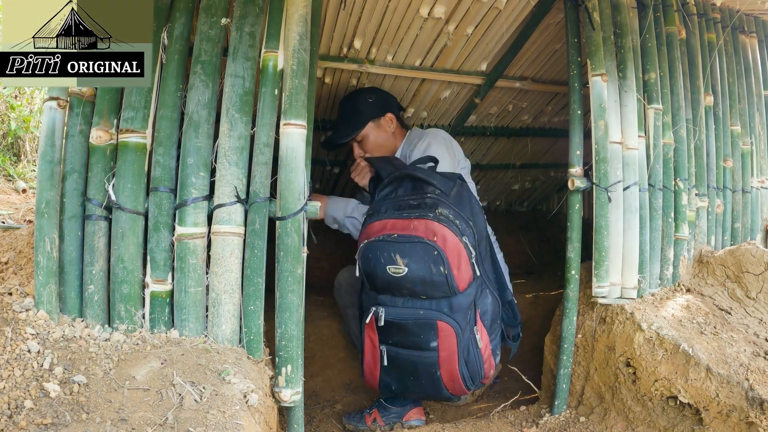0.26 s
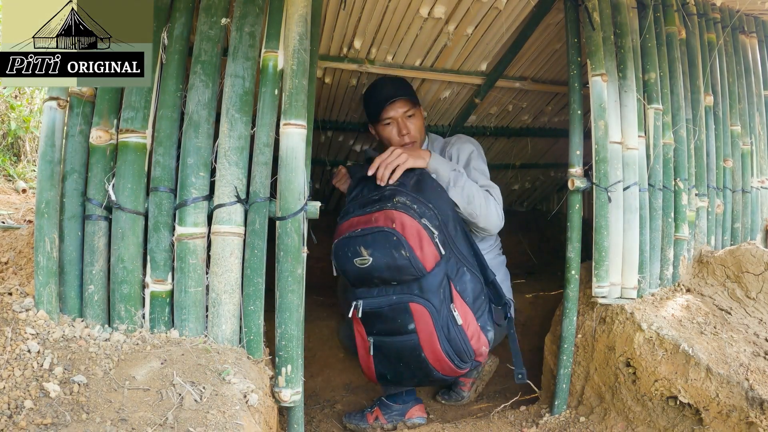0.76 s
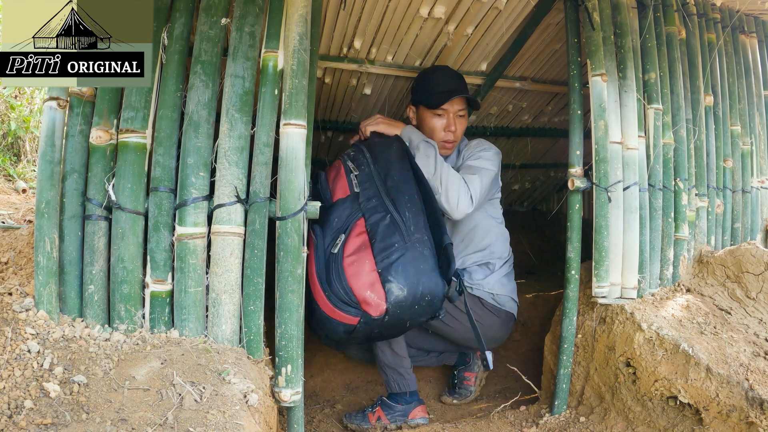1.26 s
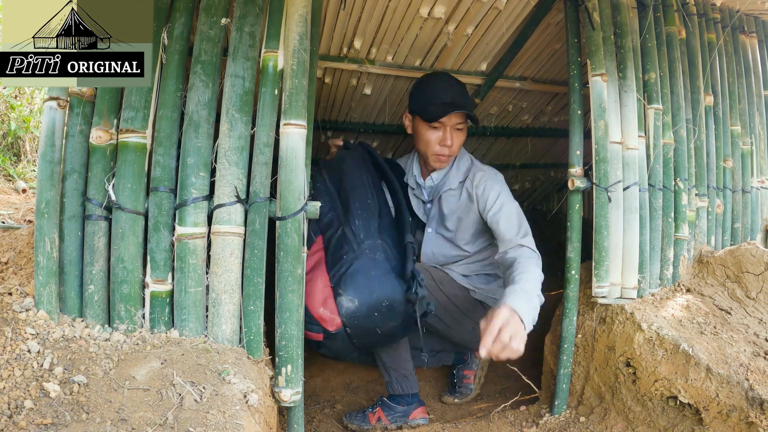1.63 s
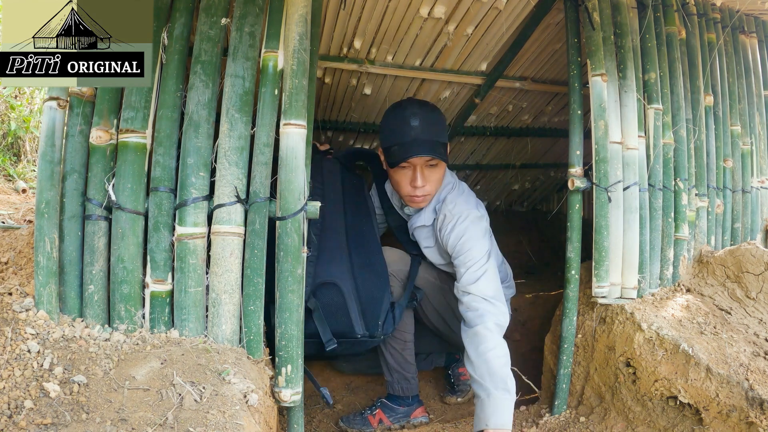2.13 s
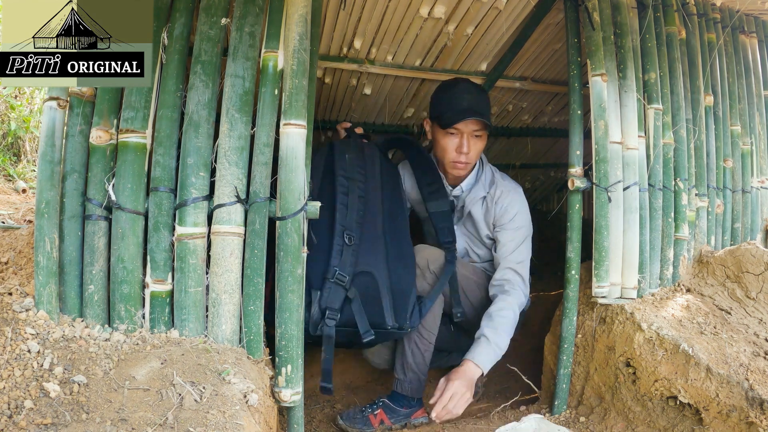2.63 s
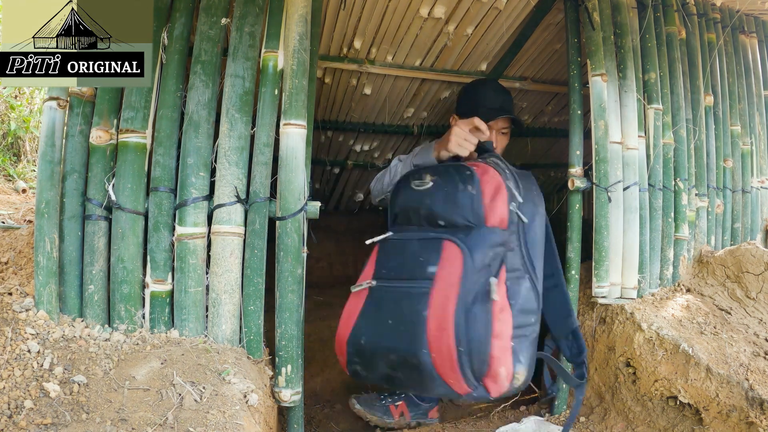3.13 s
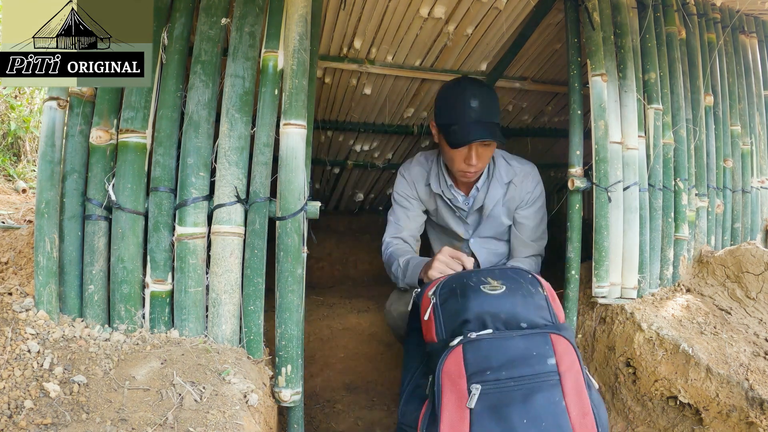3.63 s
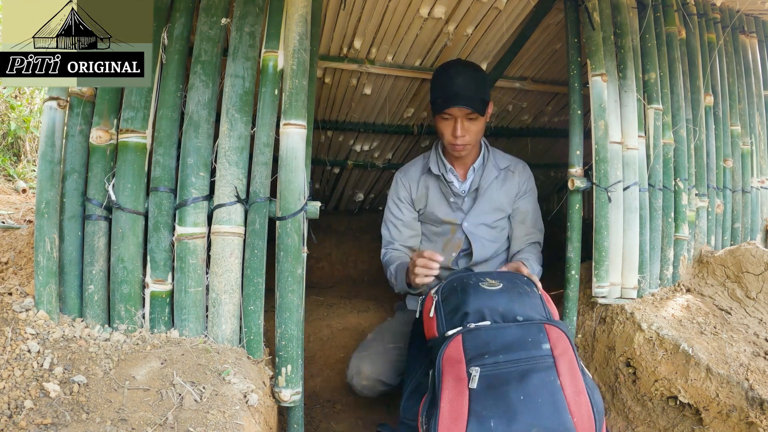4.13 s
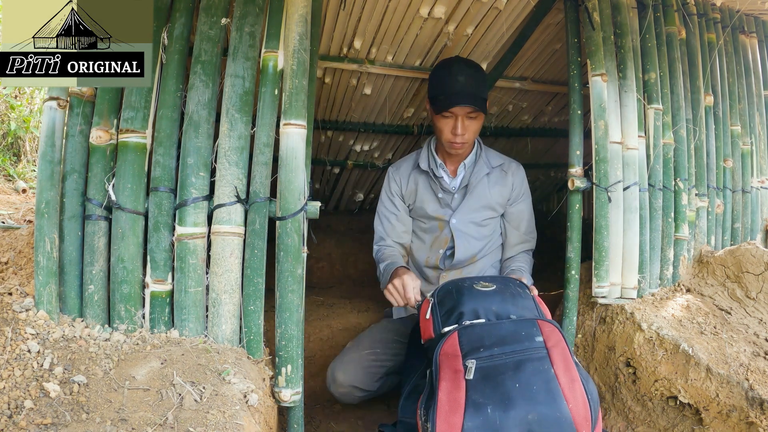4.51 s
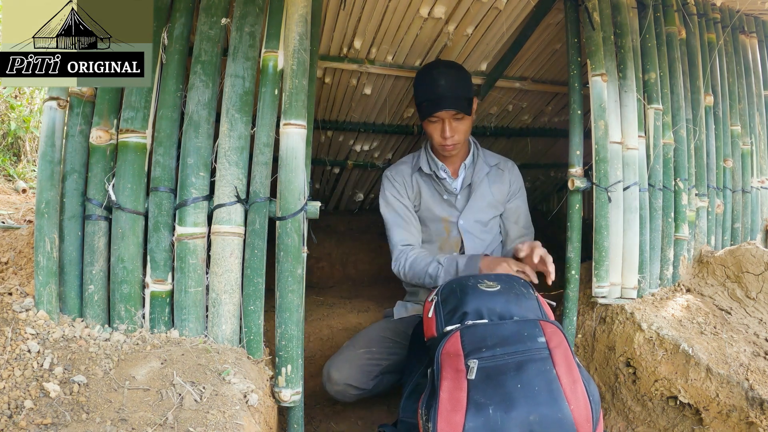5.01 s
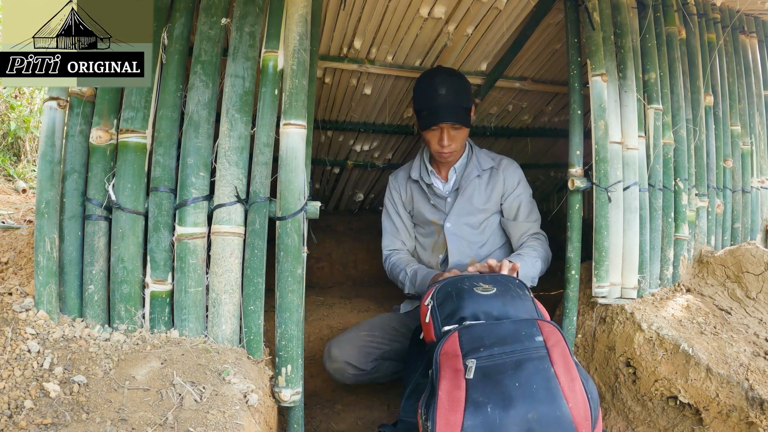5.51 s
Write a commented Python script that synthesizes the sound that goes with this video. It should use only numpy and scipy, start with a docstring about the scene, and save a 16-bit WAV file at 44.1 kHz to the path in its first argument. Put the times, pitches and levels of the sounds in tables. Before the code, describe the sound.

Birds trill and whistle over a faint river hiss while a nylon backpack is rustled, knocked, set down, zipped and patted close by.

```python
"""Beside a bamboo shelter, a river hisses far off while a backpack is handled close to a camera microphone.
From the start two birds trill arched notes over rustling nylon, and the first adds falling whistles.
A third bird, further off, gives a high pulsed whistle near 2.2 s and again near 5.2 s.
The bag is moved and set down with its loudest knock near 3.5 s, zipped at 4.7-5.1 s, then patted.
Water and cloth are shaped noise, birds are swept sines, knocks are struck resonances, the zip is a tooth train."""
import sys
import numpy as np
from scipy import signal
from scipy.fft import rfft, irfft
from scipy.io import wavfile
from scipy.ndimage import uniform_filter1d

SR = 44100
rng = np.random.default_rng(int(sys.argv[2]) if len(sys.argv) > 2 else 0)


def unload_wav(signal):
    """Save mono or channel-first audio to the path in sys.argv[1] as 16-bit WAV at rate SR, clipped to [-1, 1]."""
    wavfile.write(
        sys.argv[1],
        SR,
        np.round(np.clip(np.atleast_2d(signal).T, -1, 1) * 32767).astype(np.int16),
    )


N = 254016
T = np.arange(N) / SR


def undb(db):
    """Decibels to amplitude."""
    return 10 ** (np.asarray(db) / 20)


def unit(x):
    """Scale to an RMS of 1."""
    return x / np.sqrt(np.mean(x ** 2))


def colour(x, shape):
    """Impose a (pitch_hz, level_db) spectrum, 90 dB down outside it."""
    hz, db = np.transpose(shape)
    log_hz = np.log(np.arange(len(x) // 2 + 1) * SR / len(x) + 1)
    gain = undb(np.interp(log_hz, np.log(hz), db, left=-90, right=-90))
    return irfft(rfft(x) * gain, len(x))


def band(x, lo_hz, hi_hz):
    """Keep what lies between two frequencies."""
    return signal.sosfilt(signal.butter(3, [lo_hz, hi_hz], "bandpass", fs=SR, output="sos"), x)


def ring(x, hz, width_hz):
    """One resonance, gain 1 at its centre."""
    return signal.lfilter(*signal.iirpeak(hz, hz / width_hz, fs=SR), x)


def walk(rate):
    """Random levels held 1 / rate s and smoothed twice; spread near 1."""
    hold = int(SR / rate)
    steps = np.repeat(rng.standard_normal(N // hold + 1), hold)
    return 1.3 * uniform_filter1d(uniform_filter1d(steps, hold), hold)[:N]


def add(out, s, x):
    """Place a sound at a time in seconds, cut at the end of the scene."""
    i = max(int(s * SR), 0)
    out[i:i + len(x)] += x[:N - i]


# far water, spectrum: pitch_hz, level_db (per Hz)
RIVER_SPECTRUM = [(18, -63), (30, -34), (71, -6), (216, 5), (794, -5), (1170, -1), (2920, -5), (5170, -3.5),
                  (7830, -22), (9640, -26), (11000, -14), (13200, -46), (15000, -50)]
RIVER_DB = -51.5


def river():
    """Far water: a smooth hiss that swells a little."""
    hiss = unit(colour(rng.standard_normal(N), RIVER_SPECTRUM))
    return hiss * undb(RIVER_DB + 1.0 * walk(1.9))


def tone(rows, waver, flutter_db):
    """A near sine along (start_s, pitch_hz, level_db) rows, unsteady in pitch and level."""
    s, hz, db = np.transpose(rows)
    phase = 2 * np.pi * np.cumsum(np.interp(T, s, hz) * (1 + waver * walk(150))) / SR
    edge = np.interp(T, [s[0] - .006, s[0], s[-1], s[-1] + 0.0046], [0, 1, 1, 0])
    level = undb(np.interp(T, s, db) + flutter_db * walk(120))
    return np.sqrt(2) * edge * level * np.sin(phase)


# third bird, one call: time_ms (from the start of its level part), pitch_hz, level_db
PULSED_SHAPE = [(-128, 5950, -20), (-116, 5750, -17), (-96, 4850, -11), (-55, 4280, -9), (0, 4150, -7),
                (70, 4060, -3), (170, 3900, 0), (198, 3740, 0), (216, 3540, -3), (236, 3200, -8),
                (258, 3070, -19)]
# when it calls: start_s (of the level part), level_db, pitch_share (of the shape)
PULSED_CALLS = [(2.193, -31.5, 1.02), (5.183, -31.5, .99)]
PULSE_HZ = 53.64


def pulsed_whistles():
    """The third bird: a high falling tone whose level pulses at a steady rate."""
    out = np.zeros(N)
    ms, hz, shape_db = np.transpose(PULSED_SHAPE)
    for at, db, share in PULSED_CALLS:
        rows = np.transpose([at + ms / 1000, hz * share, db + shape_db])
        beat = (.5 + .5 * np.cos(2 * np.pi * PULSE_HZ * (T - at))) ** 2.2
        out += beat * tone(rows, .01, 1.8)
    return out


# first bird, falling whistle: time_ms (from its bend), pitch_hz, level_db
WHISTLE_SHAPE = [(-38, 1920, -20), (-8, 1760, -14), (0, 1710, -4), (45, 1660, -2), (78, 1570, 0),
                 (100, 1420, -8), (115, 1330, -22), (126, 1200, -10), (145, 1140, -26)]
# when it whistles: bend_s, level_db, pace (share of the shape's duration), stop_ms (on the shape's clock)
WHISTLES = [(.243, -32, 0.86, 78), (.74, -28, 0.91, 145), (1.338, -30.5, 0.77, 130),
            (1.832, -26.5, .88, 142)]


def falling_whistles():
    """The first bird's shared falling shape, each at its own pace and cut short where the bird breaks off."""
    out = np.zeros(N)
    ms, hz, shape_db = np.transpose(WHISTLE_SHAPE)
    for bend_s, db, pace, stop_ms in WHISTLES:
        at = np.minimum(ms, stop_ms)
        cut_hz, cut_db = np.interp(at, ms, hz), np.interp(at, ms, shape_db)
        rows = np.transpose([bend_s + pace * at / 1000, cut_hz, db + cut_db])
        out += tone(rows, 0.0061, 0.64)
    return out


def notes_of(runs, top_hz, below_db, slope):
    """Each run slows, swells and sags: rows of start_s, level_db, pitch_hz, weaker partial's trim_db."""
    rows = []
    for first, last, notes, slowing, first_db, loudest_db, last_db, loudest_at, sag in runs:
        u = np.linspace(0, 1, int(round(notes)))
        db = np.interp(u, [0, np.clip(loudest_at, .1, .9), 1], [first_db, loudest_db, last_db])
        s = first + (last - first) * (u + slowing * (u * u - u))
        # the weaker partial's trim equals below_db in a note of -22.5 dB and drops as notes get louder
        rows += zip(s, db, top_hz * (1 - sag * u ** 4.), below_db - slope * (db + 22.5))
    return rows


def trill(notes, arch, lead_ms, overtone_leads):
    """Pitch arches up and falls; the throat favours the fundamental at the top, the overtone on the slopes."""
    ms, share, first_db, second_db = np.transpose(arch)
    out, t = np.zeros(N), np.arange(ms[0], ms[-1], 1000 / SR)
    for (s, db, hz, below_db), vary in zip(notes, rng.standard_normal((len(notes), 4))):
        bent = t * (1 + 0.0825 * vary[0])
        note_hz = hz * (1 + 0.0167 * vary[2]) * np.interp(bent, ms, share)
        phase = 2 * np.pi * np.cumsum(note_hz) / SR + vary[1]
        first_gain = undb(np.interp(bent, ms, first_db) + below_db * overtone_leads)
        second_gain = undb(np.interp(bent, ms, second_db) + below_db * (not overtone_leads))
        note = first_gain * np.sin(phase) + second_gain * np.sin(2 * phase)
        add(out, s + (lead_ms + ms[0]) / 1000, undb(db - 7.0 + 1.5 * vary[3]) * note)
    return out


# one note of the first bird: time_ms (from its top), pitch_share (of the top), fundamental_db, overtone_db
LOW_ARCH = [(-14, .66, -40, -40), (-10, .76, -11, -16), (-5, .96, -5, -26), (0, 1., 0, -26),
            (4.5, .97, -3, -19), (7.5, .8, -4, -3), (11, .66, -8, -2), (16, .55, -15, -14),
            (21, .52, -40, -40)]
# one note of the second bird: same columns
HIGH_ARCH = [(-13, .62, -40, -40), (-9, .68, -15, -8), (-5, .92, -7, -14), (0, 1., 0, -19),
             (3.5, .94, -3, -11), (5.2, .8, -8, 0), (8, .65, -10, -2), (12, .56, -14, -12),
             (17, .52, -40, -40)]
# first bird, runs led by the fundamental: first_note_s, last_note_s, notes, slowing (0-1),
# first_db, loudest_db, last_db (all before the trill's 7 dB cut), loudest_at (share of run), sag (end pitch, 0-1)
LOW_RUNS = [(.056, .216, 6, .08, -29.5, -19, -21, .8, 0.05),
            (.589, .708, 5, 0.35, -29, -16.5, -19, 0.87, 0.1),
            (1.173, 1.304, 5, 0.2, -29, -18, -19.5, 0.79, 0.03),
            (1.649, 1.811, 6, 0.28, -30, -16.5, -25, .6, 0.15),
            (2.161, 2.362, 7, .26, -23, -17.5, -21.5, 0.43, .01),
            (2.604, 2.671, 3, 0.07, -25, -19, -22, .5, 0), (2.704, 2.788, 3, 0.2, -21, -20, -21, .5, 0)]
# second bird, runs led by the overtone: same columns
HIGH_RUNS = [(.042, 0.13, 3, 0.093, -29.5, -22.5, -20.5, .5, 0.0018),
             (.187, 0.43, 7, 0.11, -37, -22.5, -23.5, .5, 0.0025),
             (.544, 0.66, 4, .02, -27, -25, -30, .33, 0.014),
             (.713, 0.86, 4, 0.047, -24.5, -17.5, -24.5, .33, 0.011),
             (1.035, 1.035, 1, 0, -23, -24, -24, .5, 0), (1.172, 1.43, 7, .05, -37, -22, -21.5, .5, 0),
             (1.493, 1.587, 3, .18, -26, -24, -27.5, .5, 0.018),
             (1.812, 2.105, 8, 0.014, -24.5, -15.5, -19, .7, 0.0077),
             (2.311, 2.481, 5, 0.13, -27, -20, -20, .5, 0.0026),
             (2.799, 2.883, 3, 0.42, -35, -28, -33, .5, 0.0012)]


def trills():
    """Two trilling birds, one led by the fundamental and one by the overtone."""
    low_notes = notes_of(LOW_RUNS, top_hz=2131, below_db=-4, slope=1.1)
    high_notes = notes_of(HIGH_RUNS, top_hz=2041, below_db=-5, slope=.4)
    low = trill(low_notes, LOW_ARCH, lead_ms=5.6, overtone_leads=False)
    return low + trill(high_notes, HIGH_ARCH, lead_ms=-4., overtone_leads=True)


# the trills' echo off the ground, which combs the notes: delay_ms, level_db
GROUND = (1.87, -3)
# their repeats off posts and trees: delay_ms, level_db
ECHOES = [(4.6, -6), (10.5, -10), (13.5, -16), (17, -14), (21, -19.5), (26, -17.5)]
TREES_T60_S, TREES_DB = .22, -2.5


def birds():
    """All three birds come direct and back from the trees; the trills also come off ground and posts."""
    calls, whistles, pulsed = trills(), falling_whistles(), pulsed_whistles()
    path = np.zeros(int(.4 * SR))
    path[0] = 1
    for ms, db in [GROUND] + ECHOES:
        path[int(ms * SR / 1000)] = undb(db)
    tail = rng.standard_normal(len(path)) * 1000 ** (-T[:len(path)] / TREES_T60_S)
    tail *= undb(TREES_DB) / np.sqrt(np.sum(tail ** 2))
    # the third bird sits further off, so more of it arrives by way of the trees
    wet = signal.fftconvolve(calls + 0.42 * whistles + 1.1 * pulsed, tail)[:N]
    return signal.fftconvolve(calls, path)[:N] + whistles + pulsed + wet


# zip close by: start_s, teeth_hz (teeth a second), hum_db, scrape_db (of the slider)
ZIP = [(4.67, 204, -57, -66), (4.701, 204, -33.5, -42), (4.735, 212, -33, -30.5), (4.8, 275, -35, -28.5),
       (4.85, 360, -37, -38), (4.885, 310, -31.5, -39), (4.941, 310, -41, -52), (4.985, 240, -33.5, -47),
       (5.03, 230, -39, -44), (5.06, 260, -49, -65)]
# resonances of the slider: pitch_hz, width_hz, level_db
ZIP_BODY = [(800, 180, -6), (1230, 620, 2.5), (2300, 750, -5), (3140, 420, -11)]


def zip_pull():
    """The slider knocks each tooth: the bag's wall hums at the tooth rate, uneven knocks ring the slider."""
    s, rate, hum_db, scrape_db = np.transpose(ZIP)
    teeth = np.cumsum(np.interp(T, s, rate) * (1 + .03 * walk(100))) / SR
    pulses = np.diff(np.floor(teeth), prepend=0) * undb(3.0 * rng.standard_normal(N))
    scrape = np.zeros(N)
    for hz, width_hz, db in ZIP_BODY:
        scrape += undb(db) * unit(ring(ring(pulses, hz, width_hz), hz, width_hz))
    hum = np.sqrt(2) * undb(4.0 * walk(45)) * np.sin(2 * np.pi * teeth)
    hum_gain = undb(np.interp(T, s, hum_db, left=-120, right=-120))
    scrape_gain = undb(np.interp(T, s, scrape_db, left=-120, right=-120))
    return hum * hum_gain + unit(scrape) * scrape_gain


# ticks and knocks close by: start_s, level_db (peak of the body), pitch_hz, treble_db (before a 10.5 dB lift)
KNOCKS = [(0.754, -23.5, 1600, -10), (.78, -20.5, 1650, -11.5), (0.955, -16, 2470, -34),
          (.971, -12, 2870, -12.5), (1.093, -19.5, 1120, -17), (1.428, -24, 1390, -8.5),
          (2.002, -17, 3330, -8), (2.085, -24, 1880, -23), (2.487, -22, 730, -18), (2.732, -19, 2150, -31),
          (2.972, -23.5, 2540, -38), (3.135, -22.5, 2950, -12.5), (3.289, -22, 1200, -15),
          (3.33, -21, 1740, -17.5), (3.384, -31.5, 760, -8), (3.427, -23, 2070, -27),
          (3.458, -29, 2770, -13), (3.484, -8, 750, -12), (3.517, -11.5, 2240, -27), (3.534, -32, 730, -21),
          (3.569, -25, 2920, -20), (3.727, -17.5, 2670, -29), (3.895, -27, 3340, -15),
          (3.987, -28.5, 1280, -16), (4.422, -31.5, 1260, -12), (4.693, -25, 780, -20),
          (5.066, -37, 688, -16), (5.145, -36.5, 4400, 5), (5.198, -36, 4050, -11),
          (5.304, -23.5, 4400, -10.5), (5.329, -25, 3950, -13.5), (5.37, -30.5, 900, -13),
          (5.399, -31, 1500, -11.5), (5.468, -34.5, 1513, -12), (5.488, -24, 2980, -19),
          (5.52, -22, 2290, -20), (5.545, -15, 2100, -14), (5.591, -14.5, 905, -14),
          (5.608, -21.5, 730, -6), (5.65, -23, 818, -10), (5.671, -14, 2350, -21), (5.711, -20.5, 820, -17)]
# spectrum of the bright tick: pitch_hz, level_db (per Hz)
TICK = [(2500, -5), (4500, 17.5), (6500, 5.5), (8500, 2), (10500, -20), (15000, -34)]
KNOCK_T60_S, KNOCK_BUILD_MS = 0.066, 0.34


def knocks():
    """A sharp crack and its rattle ring the struck part near its pitch; a brighter tick rides on top."""
    out, lead = np.zeros(N), .03  # s of build-up kept before each strike
    t = T[:8192] - lead
    rattle = 1000 ** (-t / KNOCK_T60_S)
    build = np.exp(np.minimum(t, 0) * 1000 / KNOCK_BUILD_MS)
    fade = np.where(t < 0, build, rattle + 1.3 * rattle ** 6)
    dull = signal.butter(2, 5000, fs=SR, output="sos")
    for s, db, hz, treble_db in KNOCKS:
        a, b = rng.standard_normal((2, len(t)))
        struck = ring(a * fade, hz, .5 * hz) + .5 * ring(a * fade, 0.52 * hz, 0.12 * hz)
        body = signal.sosfilt(dull, struck + 0.64 * ring(b * fade, 1890, 1130))
        tick = colour(b, TICK) * fade
        treble = undb(treble_db + 10.5) * tick / np.abs(tick).max()
        add(out, s - lead, undb(db) * (body / np.abs(body).max() + treble))
    return out


# soft bumps of the bag: start_s, level_db (before the push envelope, which peaks below 1), pitch_hz
BUMPS = [(0.295, -22, 314), (0.424, -20, 279), (0.78, -31, 339), (0.962, -27, 276), (1.092, -35.5, 390),
         (1.271, -35.5, 203), (1.441, -25.5, 206), (2.049, -52, 225), (2.089, -33.5, 358),
         (2.948, -28.5, 263), (3.264, -33.5, 280), (3.429, -27, 242), (3.525, -21.5, 375),
         (3.603, -18.5, 284), (3.897, -35, 226), (3.986, -34.5, 231), (4.264, -34, 276), (4.43, -42, 304),
         (4.576, -31.5, 233), (5.148, -33.5, 265), (5.197, -38.5, 281), (5.309, -39, 230),
         (5.597, -25.5, 283), (5.717, -26.5, 376)]


def bumps():
    """Each soft bump is a low tone and a fainter one at 0.3 of its pitch under a quick push."""
    out, t = np.zeros(N), T[:4096]
    push = (t / 0.0066) * np.exp(1 - t / 0.0038)
    for s, db, hz in BUMPS:
        thud = np.sin(2 * np.pi * hz * t) + 0.18 * np.sin(.6 * np.pi * hz * t)
        add(out, s, undb(db) * push * thud)
    return out


def grains(rate, spread_db, hiss):
    """Fibres slip as dense clicks of uneven size over a smooth hiss."""
    size_db = spread_db * np.minimum(rng.exponential(size=N), 3.)
    clicks = (rng.random(N) < rate / SR) * undb(size_db) * rng.standard_normal(N)
    return unit(clicks) + hiss * rng.standard_normal(N)


# spectra of crisp rustle, cloth body and dull thump: pitch_hz, level_db (per Hz)
CRISP = [(700, -12), (1500, -12.5), (2500, 1), (4000, -2.5), (6000, -9.5), (8000, -19.5), (9500, -36),
         (12500, -22.5), (15000, -40)]
CLOTH = [(250, -9.5), (450, 1.5), (800, 4), (1300, -2.5), (2200, -2.5), (4000, -16)]
THUMP = [(25, -34), (60, -43), (100, -19.5), (160, -0.5), (230, 5), (330, 2.5), (480, -9.5)]
# movements of the bag by the microphone: full_from_s, full_until_s, rise_ms (per 20 dB), fall_ms (per 20 dB),
# crisp_db, cloth_db, thump_db
MOVES = [(0.108, 0.123, 110, 248, -52.5, -54.5, -68), (0.287, 0.305, 139, 156, -51, -48, -51),
         (0.43, 0.46, 58, 43, -76, -49, -46.5), (0.602, 0.607, 104, 88, -61.5, -49.5, -59),
         (0.778, 0.794, 33, 35, -59, -43, -49.5), (0.969, 0.97, 38, 35, -38.5, -28, -43),
         (1.093, 1.314, 148, 83, -63.5, -53, -57), (1.426, 1.511, 80, 96, -58.5, -47.5, -52),
         (2.014, 2.093, 45, 62, -59, -38, -41), (2.174, 2.3, 100, 157, -65.5, -58, -50),
         (2.432, 2.504, 96, 102, -54, -44.5, -58), (2.503, 2.707, 60, 104, -51.5, -37.5, -53.5),
         (2.95, 2.955, 37, 24, -62.5, -51, -41.5), (3.046, 3.06, 104, 90, -68, -56.5, -49),
         (3.327, 3.475, 289, 100, -58.5, -46, -47), (3.428, 3.429, 9, 12, -44.5, -47, -60),
         (3.517, 3.531, 55, 31, -47.5, -25.5, -38), (3.564, 3.6, 60, 270, -54, -38.5, -38.5),
         (3.713, 3.736, 33, 160, -60.5, -43, -49), (3.906, 3.895, 30, 67, -60.5, -48.5, -44),
         (3.992, 4.03, 37, 90, -65.5, -54, -55), (4.083, 4.397, 64, 195, -65, -55.5, -58),
         (4.699, 4.692, 29, 93, -58, -53, -28.5), (4.789, 4.851, 97, 60, -46.5, -33, -44),
         (4.912, 4.917, 86, 62, -48, -29, -58), (4.967, 4.98, 45, 118, -53.5, -36, -36.5),
         (5.094, 5.115, 28, 33, -65, -62, -48), (5.145, 5.156, 44, 30, -68, -48.5, -52),
         (5.308, 5.415, 40, 37, -71, -51, -54.5), (5.486, 5.485, 47, 24, -61, -46, -48),
         (5.529, 5.572, 29, 100, -56, -38, -44.5), (5.6, 5.613, 70, 29, -45, -30, -41.5),
         (5.67, 5.707, 18, 39, -48, -34, -37.5)]
# small stir between the movements: crisp_db, cloth_db, thump_db
FIDGET_DB = (-72, -65, -64)


def handling():
    """Nylon rubs on cloth and ground: crisp grains, a cloth body and a thump; movements add in power."""
    power = undb(FIDGET_DB)[:, None] ** 2 * np.ones(N)
    for start, stop, rise_ms, fall_ms, *db in MOVES:
        # each movement reaches 50 dB down on either side
        at = slice(max(int((start - rise_ms / 400) * SR), 0), int((stop + fall_ms / 400) * SR))
        outside = np.maximum((start - T[at]) / rise_ms, (T[at] - stop) / fall_ms)
        down_db = -20000 * np.maximum(outside, 0)
        power[:, at] += undb(np.array(db)[:, None] + down_db) ** 2
    crisp_gain, cloth_gain, thump_gain = np.sqrt(power)
    flutter = walk(30)  # shared by rustle and cloth
    crisp = colour(grains(2500, 1.06, 1.0), CRISP)
    cloth = colour(grains(900, 3.5, 0.89), CLOTH)
    thump = unit(colour(rng.standard_normal(N), THUMP))
    # rustle and cloth are levelled by their strength within these bands
    crisp = crisp / np.std(band(crisp, 6185, 9600)) * crisp_gain * undb(1.5 * flutter)
    cloth = cloth / np.std(band(cloth, 370, 920)) * cloth_gain * undb(1.6 * flutter)
    return crisp + cloth + thump * thump_gain * undb(3.5 * walk(24))


RUMBLE_DB = -87


def scene():
    """Sum the sources and spread them over two channels."""
    mid = river() + birds() + zip_pull() + knocks() + bumps() + handling()
    # the two channels differ mostly in the treble, by a filtered, noise-smeared copy of the mid
    smeared = signal.fftconvolve(mid, unit(rng.standard_normal(900)) / 30)[:N]
    top = -.15 * band(mid, 11000, 15000) + .4 * band(smeared, 11000, 15000)
    rumble = undb(RUMBLE_DB) * unit(band(rng.standard_normal(N), 18, 60))
    side = top + 0.027 * band(smeared, 5330, 7100) + undb(-59.5) * band(smeared, 60, 1900) + rumble
    return np.array([mid + side, mid - side])


PORT_NOTCH_HZ, PORT_WIDTH_HZ = 9790, 450
MIC_LOW_HZ, MIC_ROLL_HZ, TOP_HZ = 109, 13900, 15200


def record(dry):
    """The microphone port has a narrow treble notch and rolls off at both ends; the recorder cuts the top."""
    x = signal.lfilter(*signal.iirnotch(PORT_NOTCH_HZ, PORT_NOTCH_HZ / PORT_WIDTH_HZ, fs=SR), dry)
    x = signal.sosfilt(signal.butter(10, MIC_ROLL_HZ, fs=SR, output="sos"), x)
    x = signal.sosfilt(signal.butter(2, MIC_LOW_HZ, "highpass", fs=SR, output="sos"), x)
    return signal.sosfilt(signal.ellip(10, .2, 80, TOP_HZ, fs=SR, output="sos"), x)


dry = scene()
out = record(dry)
unload_wav(out)
```